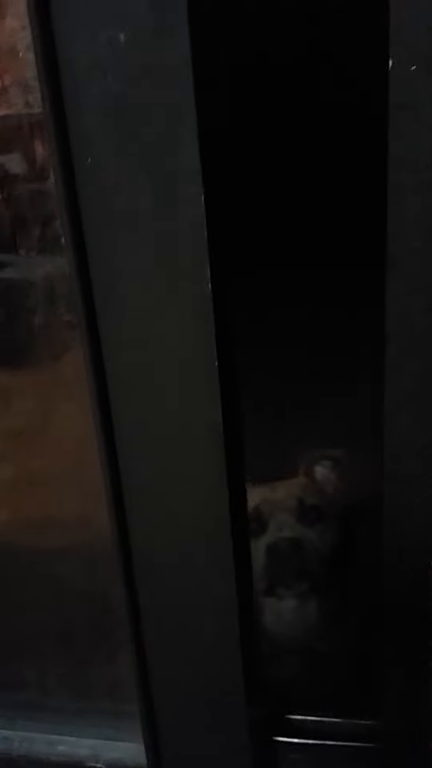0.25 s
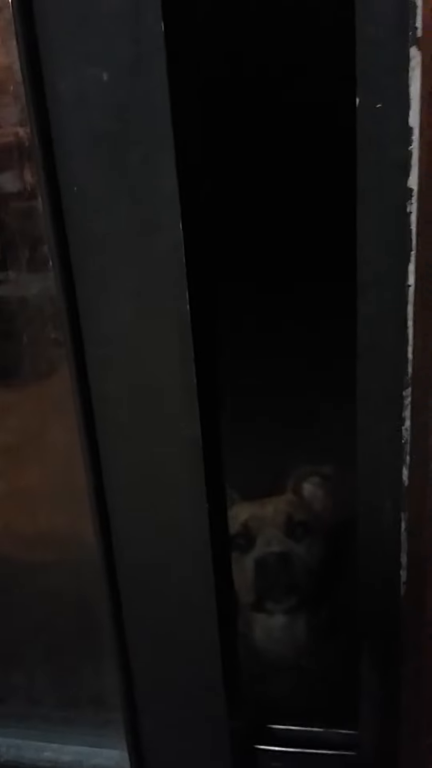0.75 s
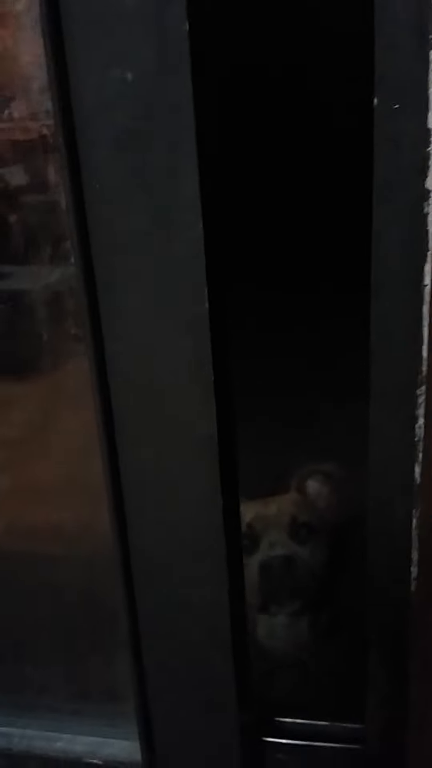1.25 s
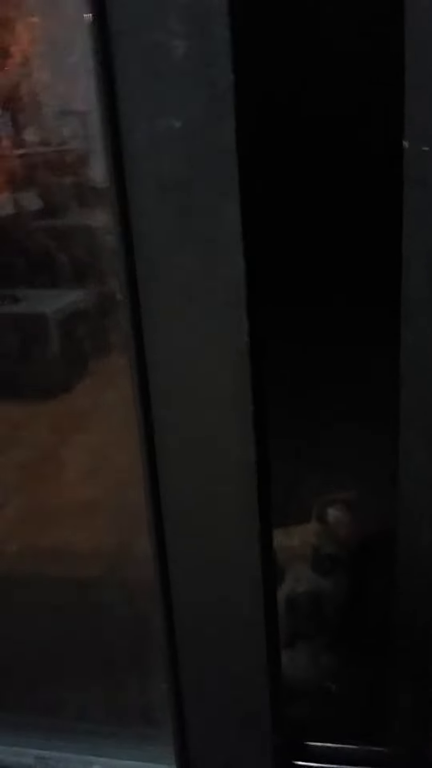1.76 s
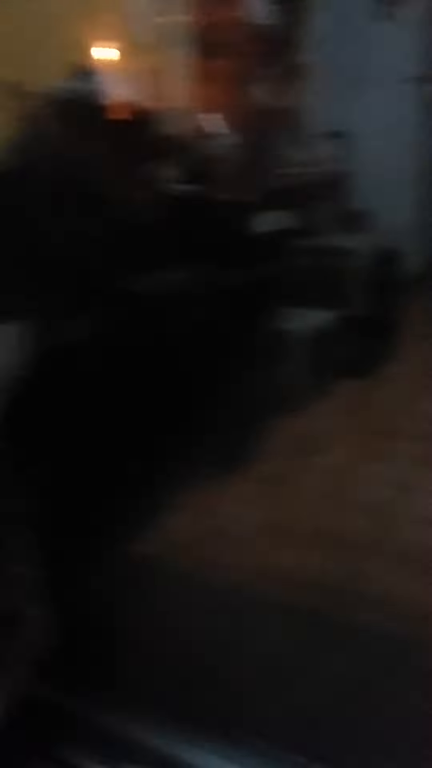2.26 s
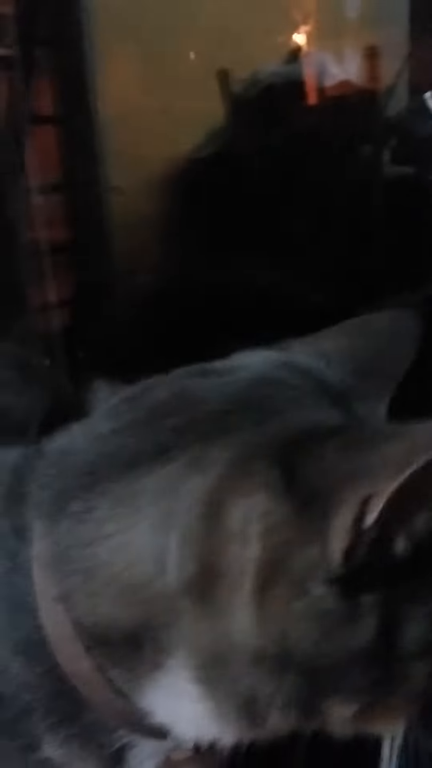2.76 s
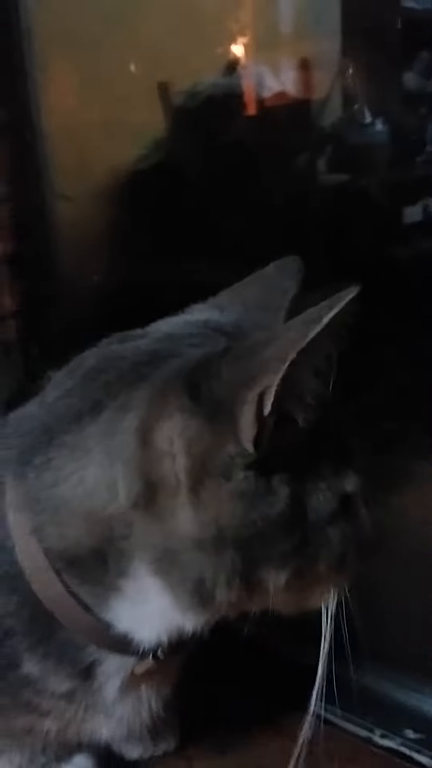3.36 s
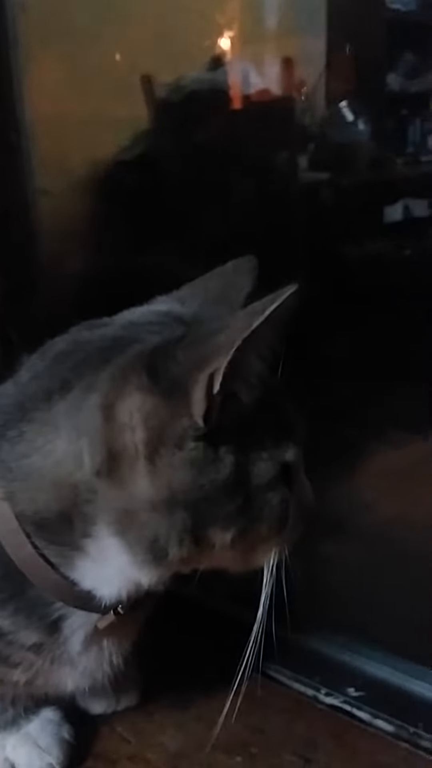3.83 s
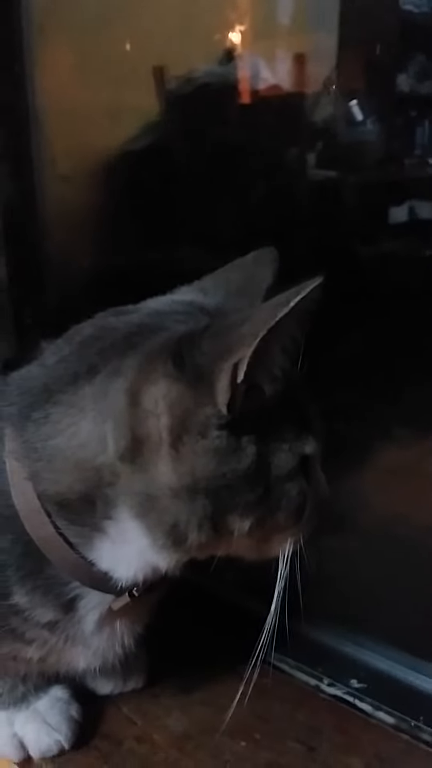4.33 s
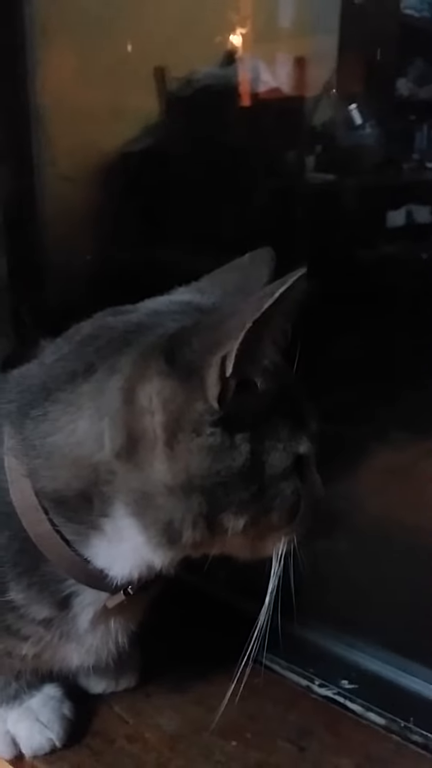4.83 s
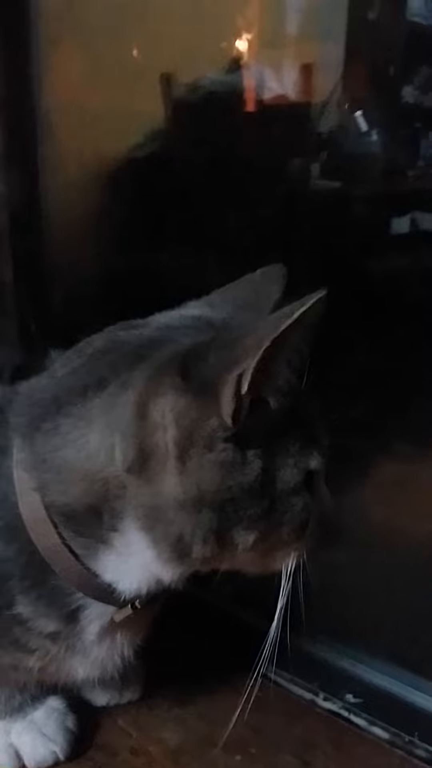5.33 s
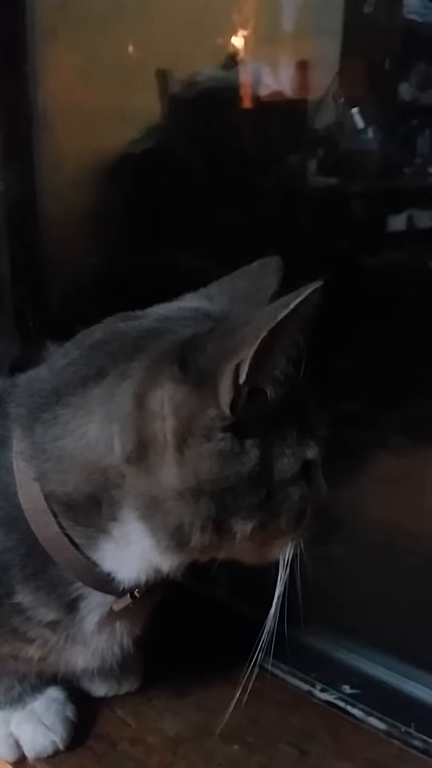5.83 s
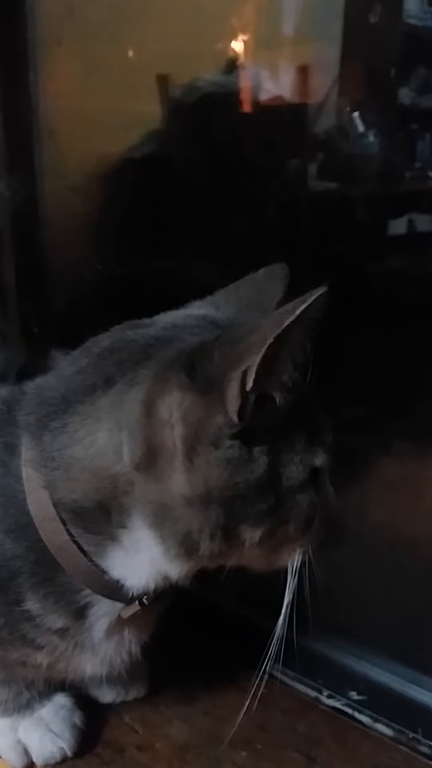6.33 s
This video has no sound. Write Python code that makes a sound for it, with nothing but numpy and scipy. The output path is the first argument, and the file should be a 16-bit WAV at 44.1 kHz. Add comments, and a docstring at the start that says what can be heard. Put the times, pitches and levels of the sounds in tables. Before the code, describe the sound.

Four loud gunshots crack outside at night, each slapping off house fronts and rolling away, heard indoors through a door held ajar.

```python
"""Four gunshots go off in the neighbourhood at night, heard through a door held ajar.
Each is a shaped pressure pulse with a ground bounce and wall echoes; filtered noise rolls away after it.
House fronts slap the pulse back, and far buildings return two of the shots as smeared noise.
Indoors the door takes one thump with a dull tail and three faint bumps: decaying sines and room noise.
Small scuffs and ticks are short noise bursts; a low, wavering noise is the night hush."""
import sys
import numpy as np
from scipy import signal
from scipy.fft import rfft, irfft
from scipy.io import wavfile

SR = 44100
rng = np.random.default_rng(int(sys.argv[2]) if len(sys.argv) > 2 else 0)


def materialize(psi):
    """Save the field psi as 16-bit PCM at rate SR to the path in sys.argv[1].

    A 1-D psi becomes a single channel; in a 2-D psi each row is a channel.
    """
    bounded = np.clip(np.atleast_2d(psi).T, -1, 1)
    quanta = np.round(bounded * 32767).astype(np.int16)
    wavfile.write(sys.argv[1], SR, quanta)


N = 290619
TIME = np.arange(N) / SR
FREQ = np.maximum(np.fft.rfftfreq(9 * 2 ** 15, 1 / SR), 1)  # filter grid, longer than the scene

# colour of the night hush: (frequency [Hz], relative density [dB per Hz])
HUSH_COLOUR = [(15, -55), (25, -39), (32, -34), (52, -18.5), (110, -6.5), (267, -4.5), (322, -1),
               (359, -8.5), (433, -9.5), (552, -10.5), (848, -14.5), (997, -18), (2770, -29.5), (3440, -46),
               (15500, -48.5)]
# room resonances: (frequency [Hz], half width [Hz], boost [dB])
ROOM_MODES = [(74.5, 6.3, 0), (311, 22.3, 4), (392, 15, 0), (480, 20, 1.5), (625, 20, 2), (693, 9, 3.5),
              (780, 14, 3), (877, 16, 2.5), (1212, 4.9, 1.5), (1794, 66, 2.5)]
# gunshots: (time [s], blast level [dB], blast treble [dB], roll level [dB], roll bite near 2 kHz [dB],
#            extra fading of the roll [dB per s], indoor reflections [dB], wall echoes [dB],
#            spacing of the door gap's peaks [Hz], strongest high ring [Hz])
SHOTS = [(1.1272, 3, 5, 1, -3, 0.5, -6, 2.5, 2430, 5030), (2.6828, 4, -7, -1, 6, 3, 5.5, 0, 2270, 4700),
         (4.4846, 6, -15, 0, 2.5, -3, 3.5, 0, 2300, 4650),
         (5.964, 3, 0.5, -1, 2.5, 6.5, 6.5, 2, 2290, 6600)]
# colour of the pressure pulse at the doorway: (frequency [Hz], relative level [dB])
BLAST_COLOUR = [(30, -33), (100, -23.5), (190, -4.5), (310, 0.5), (750, 0.5), (1000, -3), (1400, -17),
                (2200, -33), (3000, -28), (4200, -45), (7000, -45), (10000, -60.5), (16000, -83)]
# the straight path and its ground bounce: (delay [s], level [dB], treble [dB])
DIRECT_PATHS = [(0, -1.5, 3.5), (.0028, -11, -1.5)]
# reflections inside the room: (delay [s], level [dB], treble [dB])
INDOOR_PATHS = [(.0086, -17, 14), (.0125, -12.5, 8)]
# echoes from walls nearby: (delay [s], level [dB], treble [dB])
WALL_PATHS = [(.0385, -7.5, 6), (.0435, -11.5, -5), (.0575, -9.5, 4)]
# colour of the sound scattered by houses and trees: (frequency [Hz], relative level [dB])
SCATTER_COLOUR = [(30, -40), (50, -37), (72, -5.5), (150, -11), (220, -2.5), (305, -2), (440, -1),
                  (750, 0.5), (1000, -3), (1450, -12.5), (2400, -14.5), (3950, -30), (4700, -32),
                  (6800, -36), (10000, -46.5), (12500, -61), (16000, -75.5)]
# slaps off house fronts, a dull and a later bright one per shot: (time [s], level [dB], treble [dB])
SLAPS = [(1.2254, -1.5, -15), (1.3584, -15, 5), (2.7787, -6.5, -1), (2.9129, -20.5, 18.5),
         (4.5783, -3.5, -8), (4.7113, -23, 23.5), (6.0591, -4.5, -9), (6.1920, -29.5, 23)]
# a house front answers twice in quick succession: (delay [s], level [dB], treble [dB])
HOUSE_FRONT_PATHS = [(0, -1.5, 6.5), (.0021, -4, -1.5)]
# small scuffs and ticks indoors, and at 1.967 s the dull tail after the door thump:
# (time [s], level [dB], 60 dB decay [s], treble [dB])
SCUFFS_AND_TAIL = [(1.6902, -63, .15, 17), (1.967, -56.5, 0.7, -47), (2.161, -48, 0.036, -9),
                   (3.957, -61.5, 0.36, 9.5), (5.222, -56, 0.33, 12), (5.5548, -60, 0.46, 23),
                   (5.888, -60, 0.17, 20), (6.423, -50.5, 0.45, 4), (6.54, -46, 0.29, 7)]
# colour of the scuffs and the tail: (frequency [Hz], relative level [dB])
INDOOR_NOISE_COLOUR = [(100, -14), (300, 7.5), (900, 10.5), (1600, 10), (2800, 2), (4000, -17), (5500, -27),
                       (6800, -19), (7700, -36), (15000, -41)]
# bumps on the door: (time [s], level [dB])
BUMPS = [(1.908, -24.5), (2.188, -41), (3.199, -41.5), (6.422, -39)]
# ringing modes of the door: (frequency [Hz], relative level [dB], 60 dB decay [s])
DOOR_MODES = [(122, -17.5, 0.31), (175, -9, 0.14), (217.7, -6.5, 0.21), (242, 1, 0.072), (297, -10, 0.058),
              (568, -15.5, 0.11), (850, -19, 0.092)]
# late echoes from far buildings: (time [s], level [dB], 60 dB decay [s], treble [dB])
LATE_ECHOES = [(3.235, -39, 0.25, 0), (3.268, -45.5, 1.0, 2), (5.09, -50, 0.68, -12)]
# colour of the late echoes: (frequency [Hz], relative level [dB])
LATE_ECHO_COLOUR = [(100, -14), (300, 2), (550, -1.5), (900, -1), (1600, -5), (2800, -16), (3800, -43),
                    (8000, -68)]

# how the scattered sound dies away; triples are (bass, middle, treble)
RING_DB, RING_T60_S = (-13, -13.5, -20), 0.095  # the room rings right after the pulse
WALLS_DB, WALLS_DELAY_S, WALLS_SPREAD_S = (-23.5, -19, -22), 0.046, 0.017  # cluster from the nearest walls
# the street holds, then lets go
HOUSES_DB, HOUSES_HOLD_S, HOUSES_T60_S = (-25, -24, -21.5), (.13, 0.13, .16), (0.86, .7, 0.56)
FAR_DB, FAR_T60_S = (-37, -33, -39.5), (2.6, 1.824, 1.9)  # the long tail of the neighbourhood


def undb(db):
    """Decibels to gain."""
    return 10 ** (np.asarray(db) / 20)


def spectrum(points):
    """Join colour points in dB by straight lines on a log-frequency axis."""
    hz, db = np.transpose(points)
    return np.interp(np.log(FREQ), np.log(hz), db)


def above(hz):
    """Soft step from 0 to 1 around a frequency."""
    return 1 / (1 + (hz / FREQ) ** 4)


def response(db, stride=16):
    """Minimum-phase impulse response: the given colour with its energy as early as possible."""
    cepstrum = irfft(np.log(undb(db[::stride])))
    half = len(cepstrum) // 2
    # folding the cepstrum onto positive times makes the response causal
    cepstrum[1:half] *= 2
    cepstrum[half + 1:] = 0
    return irfft(np.exp(rfft(cepstrum)))


def colour(x, gain):
    """Filter by a gain for each frequency."""
    return irfft(rfft(x, 2 * (len(FREQ) - 1)) * gain)[:N]


def noise(db):
    """Noise of rms 1 with the given colour."""
    x = colour(rng.standard_normal(N), undb(db))
    return x / x.std()


def add(out, s, x):
    """Mix a sound in from time s on."""
    start = max(int(s * SR), 0)
    out[start:start + len(x)] += x[:N - start]


def release(t60, hold_s=0):
    """Full level for a while, then exponential decay by 60 dB per t60."""
    return np.exp(-np.log(1000) * np.clip((TIME - hold_s) / t60, 0, 10))


def fade(t60, rise_s=.002):
    """Quick rise and exponential decay."""
    rise = (1 - np.exp(-np.minimum(TIME / rise_s, 20))) ** 2
    return rise * release(t60)


def room():
    """The room's resonances as peaks in dB."""
    return sum(db / (1 + ((FREQ - hz) / width) ** 2) for hz, width, db in ROOM_MODES)


def hush(level_db=-53, waver_db=0.65, sink_db=4, sink_hold_s=1.183, sink_return_s=0.23,
         opening_db=3.5, opening_s=0.72):
    """Distant town noise, coloured by the room; it swells at first, wavers, and sinks after each shot."""
    knots = np.arange(0, TIME[-1], .05)
    waver = waver_db * np.interp(TIME, knots, rng.standard_normal(len(knots)))
    sunk = np.zeros(N)
    for s, *_ in SHOTS:
        recovering = np.clip(1 - (TIME - s - sink_hold_s) / sink_return_s, 0, 1)
        sunk = np.maximum(sunk, (TIME > s) * recovering)
    opening = np.maximum(1 - TIME / opening_s, 0)
    loudness_db = level_db - sink_db * sunk - opening_db * opening + waver
    return noise(spectrum(HUSH_COLOUR) + .5 * room()) * undb(loudness_db)


def blast(paths, treble_db, lift_db=25.5, edge_hz=1400, room_share=0.79):
    """One pressure pulse, arriving along several paths and ringing the room."""
    out = np.zeros(N)
    pulse_db = spectrum(BLAST_COLOUR) + lift_db + room_share * room()
    for delay, db, path_treble_db in paths:
        tilt_db = (treble_db + path_treble_db) * above(edge_hz)
        add(out, delay, response(pulse_db + db + tilt_db))
    return out


def reflections(patchy_db=2.0, clump_s=.004):
    """Dense reflections that arrive in clumps: noise with a jittering level."""
    knots = np.arange(0, TIME[-1], clump_s)
    patches = np.interp(TIME, knots, rng.standard_normal(len(knots)))
    return rng.standard_normal(N) * undb(patchy_db * patches)


def ripple(depth_db=2.0, spacing_hz=45):
    """Higher up the room's modes crowd together: an irregular ripple in dB."""
    knots = np.arange(0, SR / 2, spacing_hz)
    heights = rng.standard_normal(len(knots))
    return depth_db * np.interp(FREQ, knots, heights) * above(1000)


def door_gap(spacing_hz, ring_hz, depth_db=1.5, from_hz=3300, ring_db=2.5, ring_width_hz=230,
             hollow_hz=4050, hollow_db=-5, hollow_width_hz=170):
    """Short waves bounce across the door gap: even peaks and dips in dB, one strong peak, one hollow."""
    comb = depth_db * np.cos(2 * np.pi * FREQ / spacing_hz) * above(from_hz)
    peak = ring_db / (1 + ((FREQ - ring_hz) / ring_width_hz) ** 2)
    hollow = hollow_db / (1 + ((FREQ - hollow_hz) / hollow_width_hz) ** 2)
    return comb + peak + hollow


def dying_away(band):
    """Envelope of one band: room ring, nearest walls, street and far tail add up in power."""
    ring = undb(RING_DB[band]) * release(RING_T60_S)
    from_cluster = (TIME - WALLS_DELAY_S) / WALLS_SPREAD_S
    walls = undb(WALLS_DB[band]) * np.exp(-np.minimum(from_cluster ** 2, 20))
    houses = undb(HOUSES_DB[band]) * release(HOUSES_T60_S[band], HOUSES_HOLD_S[band])
    far = undb(FAR_DB[band]) * release(FAR_T60_S[band])
    return np.sqrt(ring ** 2 + walls ** 2 + houses ** 2 + far ** 2)


def roll(field, colour_db, bite_db, fading_db, bite_hz=2100, bite_octaves=0.68, bass_hz=220, treble_hz=2600):
    """The scattered blast rolls away; bass, middle and treble each die away in their own time."""
    gain = undb(spectrum(SCATTER_COLOUR) + colour_db)
    gain = gain / np.sqrt(np.mean(gain ** 2))
    gain = gain * undb(bite_db * np.exp(-(np.log2(FREQ / bite_hz) / bite_octaves) ** 2))
    bands = [1 - above(bass_hz), above(bass_hz) - above(treble_hz), above(treble_hz)]
    out = sum(colour(field, gain * share) * dying_away(band) for band, share in enumerate(bands))
    return out * undb(-fading_db * np.minimum(TIME, .5))  # extra fading acts over the first half second


def gunshots(alike=0.42, build_s=0.0098, indoors_s=0.022):
    """All shots meet the same houses, so part of their reflection pattern repeats."""
    out, houses = np.zeros(N), reflections()
    room_db = room() + ripple()
    for (s, blast_db, treble_db, roll_db, bite_db, fading_db,
         indoors_db, echoes_db, gap_hz, ring_hz) in SHOTS:
        for paths, db in [(DIRECT_PATHS, blast_db), (INDOOR_PATHS, indoors_db), (WALL_PATHS, echoes_db)]:
            add(out, s, undb(db) * blast(paths, treble_db))
        field = np.sqrt(alike) * houses + np.sqrt(1 - alike) * reflections()
        rolling = roll(field, room_db + door_gap(gap_hz, ring_hz), bite_db, fading_db)
        # scatter builds up behind the pulse; its earliest part comes from the room itself
        build = np.minimum(TIME / build_s, 1)
        early = undb(indoors_db * np.exp(-(TIME / indoors_s) ** 2))
        add(out, s, undb(roll_db) * build * early * rolling)
    return out


def slaps(air_db=-6, air_hz=4500):
    """House fronts return each shot about 0.1 and 0.23 s later; the air softens the top."""
    out = np.zeros(N)
    for s, db, treble_db in SLAPS:
        add(out, s, undb(db) * blast(HOUSE_FRONT_PATHS, treble_db))
    return colour(out, undb(air_db * above(air_hz)))


def scuffs_and_thump_tail(edge_hz=3500):
    """Small scuffs and ticks, and the room's dull answer to the door thump: decaying coloured noise."""
    out = np.zeros(N)
    for s, db, t60, treble_db in SCUFFS_AND_TAIL:
        burst = noise(spectrum(INDOOR_NOISE_COLOUR) + treble_db * above(edge_hz))
        add(out, s, undb(db) * burst * fade(t60, rise_s=0.00022))
    return out


def door(room_db=-15.0, room_t60=1.16, dull_hz=650, dull_db=-14, contact_s=0.0017):
    """Soft bumps ring the door's low modes, and the room answers dully."""
    out = np.zeros(N)
    ring = np.zeros(N)
    for hz, db, t60 in DOOR_MODES:
        ring += undb(db) * fade(t60, contact_s) * np.sin(2 * np.pi * hz * TIME)
    for s, db in BUMPS:
        answer = noise(spectrum(HUSH_COLOUR) + dull_db * above(dull_hz)) * fade(room_t60, rise_s=0.0077)
        add(out, s, undb(db) * (ring + undb(room_db) * answer))
    return out


def late_echoes(rise_s=.0025, edge_hz=700):
    """Far buildings return a shot about half a second later, smeared into noise and without its top."""
    out = np.zeros(N)
    for s, db, t60, treble_db in LATE_ECHOES:
        smear = noise(spectrum(LATE_ECHO_COLOUR) + room() + treble_db * above(edge_hz))
        add(out, s, undb(db) * smear * fade(t60, rise_s))
    return out


def scene():
    """Shots and their echoes outside, small sounds inside, all over the hush."""
    outside = gunshots() + slaps() + late_echoes()
    inside = scuffs_and_thump_tail() + door()
    return (hush() + outside + inside)[None]


def record(dry, top_hz=15750):
    """Round the highest peaks smoothly and cut everything above the top frequency."""
    rounded = dry / (1 + dry ** 6) ** (1 / 6)
    top_cut = signal.ellip(8, .2, 70, top_hz, fs=SR, output="sos")
    return signal.sosfilt(top_cut, rounded)


dry = scene()
out = record(dry)
materialize(out)
```